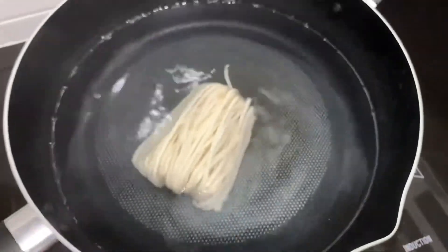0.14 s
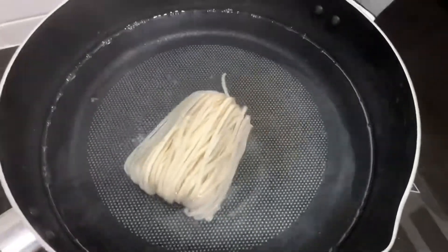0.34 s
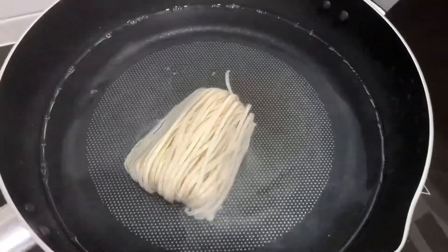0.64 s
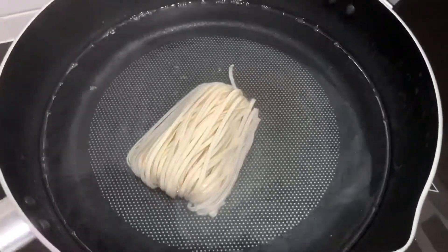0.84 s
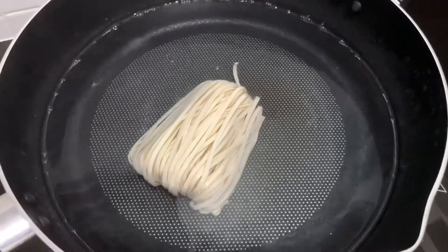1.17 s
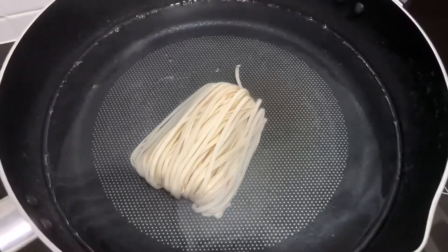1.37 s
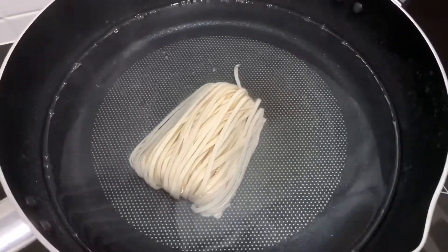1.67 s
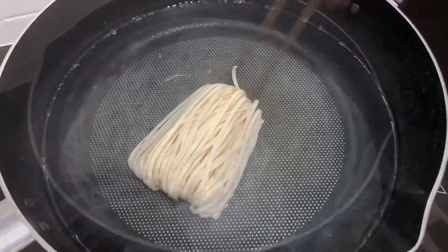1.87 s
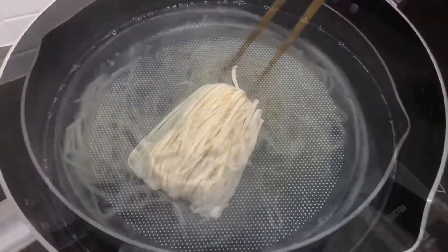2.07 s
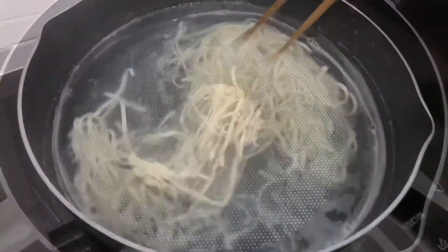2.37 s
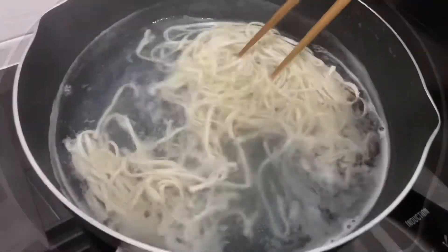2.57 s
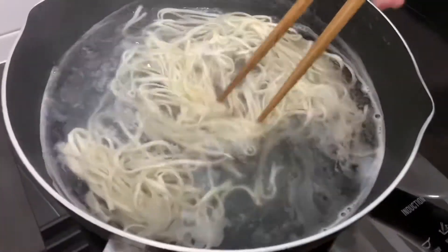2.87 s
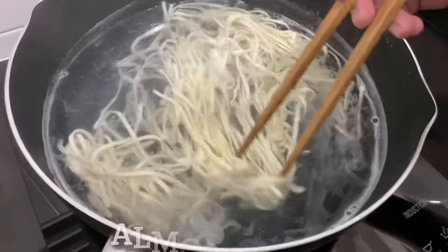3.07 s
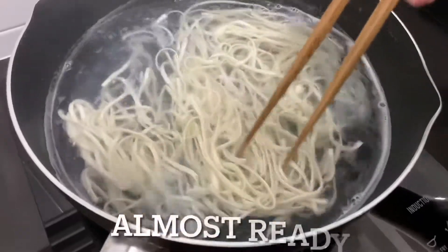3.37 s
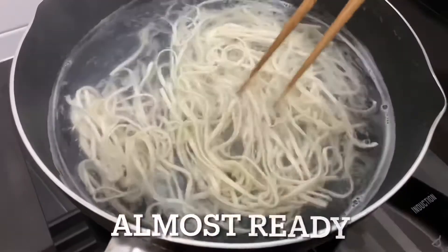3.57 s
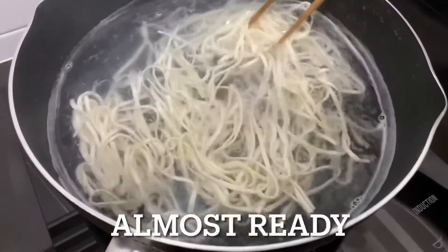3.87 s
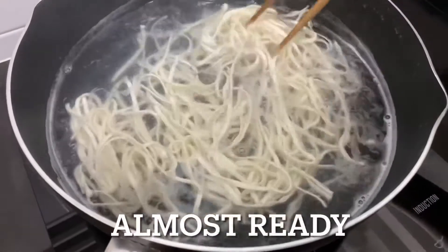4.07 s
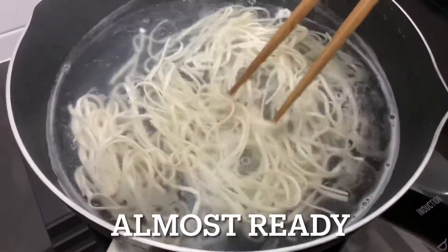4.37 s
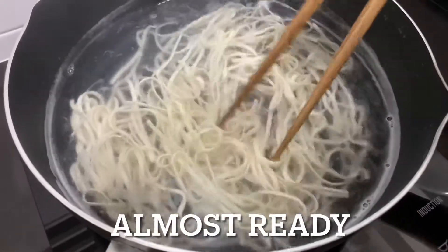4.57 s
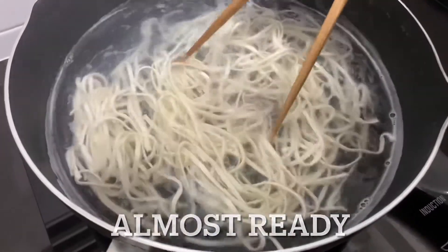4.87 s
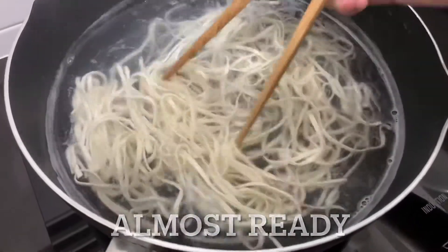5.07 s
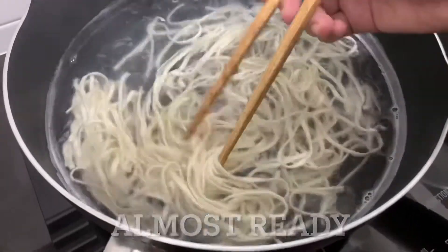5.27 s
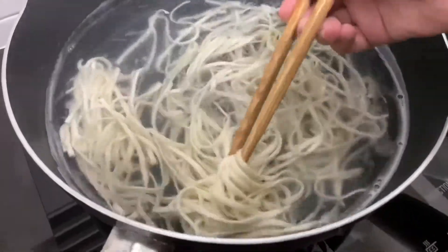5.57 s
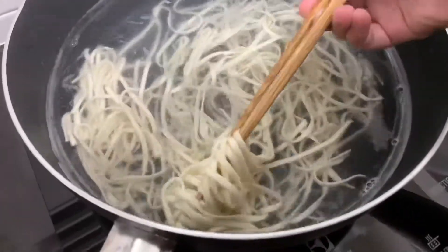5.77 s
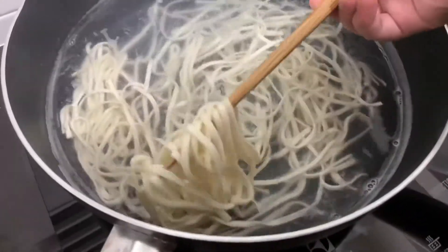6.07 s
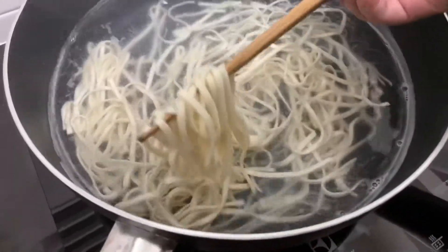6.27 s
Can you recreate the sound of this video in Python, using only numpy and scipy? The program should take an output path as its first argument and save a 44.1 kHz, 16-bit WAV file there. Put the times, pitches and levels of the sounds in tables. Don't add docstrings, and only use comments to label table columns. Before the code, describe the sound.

A cooling fan hums low and wavering under a pan of softly simmering water, then a louder boil buzzes and bubbles with short steam hisses.

```python
import sys
import numpy as np
from scipy import signal
from scipy.fft import irfft
from scipy.io import wavfile
from scipy.ndimage import uniform_filter1d

SR = 44100
rng = np.random.default_rng(int(sys.argv[2]) if len(sys.argv) > 2 else 0)


def to_linear_factor(level_db):
    exponent = np.asarray(level_db, float) / 20
    return 10 ** exponent


def dump(signal):
    limited = np.clip(np.atleast_2d(signal).T, -1, 1)
    pcm = np.round(limited * 32767).astype(np.int16)
    wavfile.write(sys.argv[1], SR, pcm)


N = 283563
T = np.arange(N) / SR
HZ, FRAME_S = signal.stft(T, SR, nperseg=1024, noverlap=768)[:2]


def evened(x):
    return x / np.sqrt(np.mean(abs(x) ** 2) + 1e-20)


def read(points, hz):
    f, value = np.transpose(points)
    return np.interp(np.log(hz + 1), np.log(f + 1), value)


def spectra(x):
    return signal.stft(x, nperseg=1024, noverlap=768)[2]


def waves(z):
    return signal.istft(z, nperseg=1024, noverlap=768)[1][..., :N]


def waver(width_hz):
    r = np.exp(-np.pi * width_hz / SR)
    z = rng.standard_normal(N + SR) + 1j * rng.standard_normal(N + SR)
    once = signal.lfilter([1], [1, -r], z)
    return evened(signal.lfilter([1], [1, -r], once)[SR:])


def patchy(shape, bins, frames):
    field = uniform_filter1d(rng.standard_normal(shape), size=bins, axis=0)
    return evened(uniform_filter1d(field, size=frames, axis=1))


def bump(hz, width_hz):
    return 1 / (1 + (2 * (HZ - hz) / width_hz) ** 2)


def band(x, lo_hz, hi_hz):
    return signal.sosfiltfilt(signal.butter(2, [lo_hz, hi_hz], "band", fs=SR, output="sos"), x)


# time in seconds, share of the boil from 0 to 1.
DISSOLVE = [(0, 0), (1.75, 0.05), (2.0, 0.27), (2.3, 0.49), (2.65, 0.97), (6.43, 1)]


def boil_share(t):
    return np.clip(np.interp(t, *np.transpose(DISSOLVE)), 0, 1)


# frequency in Hz, shared part from 0 to 1.
PORT_LIKENESS = [(60, .9), (170, .98), (300, .75), (600, .5), (1100, .5), (1700, .25), (3100, .3),
                 (3800, .7), (4600, .99), (16000, .99)]


def ports(z, turn):
    same = np.clip(read(PORT_LIKENESS, HZ), 0, 1)[:, None]
    lag = -2 * np.pi * (HZ - 6820) / 4125
    phase = np.where(HZ < 3500, read(turn, HZ) * (HZ > 200), lag)
    right = same * np.exp(1j * phase)[:, None] * z[0] + np.sqrt(1 - same ** 2) * z[1]
    return np.array([z[0], right])


# time in seconds, level in dB.
BLADE_LEVEL = [(0, -34), (.7, -36), (.9, -36.5), (1.0, -34), (1.1, -35.5), (1.8, -37.5), (2.08, -35.5),
               (2.2, -39), (2.4, -36.5), (2.65, -31.5), (3.03, -33), (3.3, -31), (3.62, -32.5), (4.42, -33),
               (4.54, -35.5), (4.68, -33), (5.4, -32.5), (6.43, -34.5)]
# frequency in Hz, simmer level in dB, boil level in dB, waver from 0 to 1.
STEADY_HUMS = [(100.43, -49, -57, .2), (105.1, -58, -59, 0.5), (135.6, -59.5, -59.5, 1),
               (144, -62, -57, 0.8)]
# frequency in Hz, width in Hz, level in dB.
HOUSING_HUMS = [(46.1, 7.9, -55.5), (65.1, 10, -61), (81, 14, -64), (151.2, 18, -55), (185.3, 40, -59)]


def fan():
    share = boil_share(T)
    blade_hz = np.where(share < 0.33, 129.4, 127.95)
    turn = np.exp(2j * np.pi * np.cumsum(blade_hz) / SR)
    tone = to_linear_factor(np.interp(T, *np.transpose(BLADE_LEVEL))) * turn * (1 + 0.094 * waver(38) + 0.069 * waver(5))
    for hz, simmer_db, boil_db, loose in STEADY_HUMS:
        level = to_linear_factor(simmer_db + (boil_db - simmer_db) * share)
        tone = tone + level * np.exp(2j * np.pi * hz * T) * (1 + loose * waver(1.5))
    for hz, width_hz, db in HOUSING_HUMS:
        tone = tone + to_linear_factor(db) * waver(width_hz) * np.exp(2j * np.pi * hz * T)
    lean = to_linear_factor([[-0.3], [0.3]]) * np.exp([[0.04j], [-0.04j]])
    return np.sqrt(2) * (tone * lean).real


# multiple of the mains, level in dB, waver width in Hz, clean share from 0 to 1,
# lead of the left port in radians.
COIL_LINES = [(9, -44, 26, 0.97, 0.98), (12, -56, 32, 0.08, 0), (16, -62, 14, 0.5, -0.0071),
              (20, -51, 45, .4, -0.55), (24, -59.5, 10, 0.17, -1.5), (27, -53, 13, 0.4, 1.66),
              (44, -69.5, 6, 0.1, 0.75), (45, -66, 6.6, 0.8, 0.41)]


def coil():
    mains_hz = 49.97
    out = np.zeros((2, N))
    for multiple, db, width_hz, clean, lead in COIL_LINES:
        turn = np.exp(2j * np.pi * multiple * mains_hz * T)
        line = to_linear_factor(db) * (np.sqrt(clean) + np.sqrt(1 - clean) * waver(width_hz)) * turn
        out += np.sqrt(2) * (line * np.exp(0.5j * np.array([[lead], [-lead]]))).real
    return out * boil_share(T)


# time in seconds, level in dB.
WATER_SWELL = [(0, -1), (.6, -1), (1.5, 0), (2.4, 0.5), (3, 0.5), (4.8, 0.3), (6.43, 0)]


def air(tone_db, turn, patchy_db, blob_db, flicker_db):
    z = spectra(rng.standard_normal((2, N))) * np.sqrt(SR / 2)
    wide = patchy(z.shape[1:], bins=10, frames=14)
    narrow = patchy(z.shape[1:], bins=2, frames=5)
    flicker = evened(uniform_filter1d(rng.standard_normal(len(FRAME_S)), size=6))
    swell = np.interp(FRAME_S, *np.transpose(WATER_SWELL)) * (HZ > 200)[:, None]
    level_db = tone_db[:, None] + patchy_db * wide + blob_db * narrow + flicker_db * flicker + swell
    return ports(z * to_linear_factor(level_db), turn)


# frequency in Hz, level in dB per Hz.
SIMMER_NOISE = [(28, -99), (45, -75), (90, -72.5), (200, -80.5), (250, -80), (400, -80.5), (950, -79.5),
                (1200, -87), (1600, -85.5), (2000, -89.5), (4000, -102), (5500, -109), (7000, -116),
                (15500, -120)]
BOIL_NOISE = [(28, -99), (45, -74), (90, -74), (200, -75.5), (250, -80.5), (550, -73.5), (1150, -79.5),
              (2100, -84.5), (4000, -93), (6000, -101), (7200, -113), (10000, -117), (15500, -119)]
# frequency in Hz, width in Hz, lift in dB.
PAN_RINGS = [(313, 36, 8), (432, 48, 8.5), (507, 51, 7), (594, 50, 3.5), (835, 120, 4), (1015, 85, 10.5),
             (1436, 71, 7), (1625, 160, 6), (1926, 61, 6), (2607, 390, 6), (3450, 120, 4.5)]
# frequency in Hz, phase in radians.
SIMMER_PHASE = [(200, -3), (500, 1.5), (800, 2.6), (1600, 1.5), (2200, 4), (3000, 4), (3500, 4.5)]
BOIL_PHASE = [(200, 1), (450, 0.6), (700, 1.55), (1200, 2), (1500, 0.05), (2200, -2), (3500, -1.7)]


def water():
    share = boil_share(FRAME_S)
    pan_db = sum(db * bump(hz, width_hz) for hz, width_hz, db in PAN_RINGS)
    simmer = air(read(SIMMER_NOISE, HZ), SIMMER_PHASE, patchy_db=1.38, blob_db=3.0, flicker_db=0.5)
    boil = air(read(BOIL_NOISE, HZ) + pan_db, BOIL_PHASE, patchy_db=1.0, blob_db=3.0, flicker_db=0.5)
    return waves(np.sqrt(1 - share ** 2) * simmer + share * boil)


# start in seconds, length in seconds, bright level in dB, dull level in dB,
# whistle in Hz (0 or below for none).
STEAM_JETS = [(.5, .07, -82, -72, 0), (0.734, 0.039, -67, -63.5, 0), (.93, 0.046, -80, -85, 12000),
              (1.09, 0.046, -57, -58, 0), (1.13, .04, -73, -68, 12997), (1.46, 0.067, -78, -58, 0),
              (1.768, 0.12, -85, -65, -2), (1.997, .04, -78, -59, 0), (2.085, 0.082, -82, -63, 9000),
              (2.173, 0.054, -82, -62, 6300), (2.41, 0.36, -62, -60, 6740), (2.61, 0.2, -73, -82, 10200),
              (4.076, 0.27, -66, -56.5, 0), (4.19, 0.1, -76, -69, 10000), (4.86, 0.31, -67.5, -60, 8595),
              (4.95, 0.53, -57.5, -56, 8900), (5.246, 0.13, -71, -68, 14500)]
# frequency in Hz, level in dB.
STEAM_COLOUR = [(2500, -41), (4500, 3.5), (6000, 0), (7800, -3), (12000, -1.5), (15500, -2.5)]
# start in seconds, peak level in dB.
BUBBLE_SNAPS = [
    (2.1975, -56),
    (2.8594, -51),
    (3.5, -61),
]


def steam():
    fine = evened(uniform_filter1d(rng.standard_normal(N), size=60))
    coarse = evened(uniform_filter1d(rng.standard_normal(N), size=500))
    noise = rng.standard_normal((2, N)) * evened(to_linear_factor(1.1 * fine + 0.77 * coarse))
    jets = np.zeros((2, N))
    high = 1 / (1 + (7800 / (HZ + 1)) ** 8)
    for s, length, bright_db, dull_db, whistle_hz in STEAM_JETS:
        at = slice(round(s * SR), round((s + length) * SR))
        hiss = np.sqrt(high * to_linear_factor(2 * bright_db) + (1 - high) * to_linear_factor(2 * dull_db))
        colour = hiss * to_linear_factor(10.5 * bump(whistle_hz, 1400))
        jet = noise[:, at] * signal.windows.tukey(at.stop - at.start, np.clip(2.0 * length + 0.084, 0, 1))
        jets[:, at] += signal.fftconvolve(jet, np.fft.fftshift(irfft(colour))[None], "same", axes=1)
    for s, db in BUBBLE_SNAPS:
        jets[:, round(s * SR):][:, :40] += to_linear_factor(db + 3.0) * noise[:, :40] * np.exp(-np.arange(40) / 12)
    z = spectra(jets)
    wide = patchy(z.shape[1:], bins=12, frames=10)
    narrow = patchy(z.shape[1:], bins=2, frames=4)
    level_db = read(STEAM_COLOUR, HZ)[:, None] + 3.5 * wide + 2.1 * narrow
    return waves(ports(z * to_linear_factor(level_db), BOIL_PHASE))


def scene():
    return water() + fan() + coil() + steam()


# start in seconds, peak level in dB.
SLIP_TICKS = [
    (.102, -38),
    (.166, -44),
    (2.724, -31),
    (2.81, -44),
    (2.963, -37),
    (3.01, -38),
]


def ticks():
    out, t = np.zeros(N), np.arange(800) / SR
    chirp = np.sin(2 * np.pi * np.cumsum(300 + 2000 * np.exp(-t / 0.002)) / SR)
    tick = chirp * np.exp(-t / 0.003) * np.minimum(t / 0.0003, 1)
    for s, db in SLIP_TICKS:
        out[round(s * SR):][:len(t)] += to_linear_factor(db) * tick
    return out


# start in seconds, stop in seconds, low edge in Hz,
# high edge in Hz, turn in radians.
PORT_SLIPS = [(2.5, 3.025, 530, 800, 1.26), (2.45, 3.025, 950, 1060, 1.06), (2.9, 3.08, 60, 200, 0.24),
              (2.6, 3.025, 154, 340, 1), (2.91, 3.025, 250, 1700, 0.73), (0.098, 0.118, 230, 2300, 1.36),
              (0.093, .13, 60, 220, 0.39), (2.72, 2.746, 230, 1100, 1.54), (2.724, 2.748, 60, 213, 0.69),
              (2.805, 2.82, 60, 600, 0.21), (2.99, 3.025, 200, 1300, 1.16), (.165, .185, 60, 900, .3)]


def slip(mid, side):
    for start, stop, lo_hz, hi_hz, turn in PORT_SLIPS:
        at = slice(max(round((start - 0.1) * SR), 0), round((stop + 0.1) * SR))
        angle = turn * uniform_filter1d(1.0 * ((T[at] > start) & (T[at] < stop)), size=120)
        part = band(mid[at], lo_hz, hi_hz)
        side[at] += np.sin(angle) * signal.hilbert(part).imag
        mid[at] += (np.cos(angle) - 1) * part
    return mid, side


# low edge in Hz, high edge in Hz.
SUM_GAPS = [(4500, 5010), (8350, 9550), (12450, 13700)]
DIFFERENCE_GAPS = [(6350, 7500), (10500, 11650), (14500, 30000)]


def drop_gaps(mid, side):
    edge_hz = 70 * patchy((len(HZ), len(FRAME_S)), bins=30, frames=5)
    both = spectra(np.array([mid, side]))
    hiss = both[1, (HZ > 8400) & (HZ < 9500)]
    hiss_db = 10 * np.log10(np.mean(abs(hiss) ** 2, axis=0) + 1e-20)
    excess_db = np.maximum(hiss_db - np.median(hiss_db) - 0.5, 0)
    edge_hz = edge_hz + 30 * np.outer((HZ > 7900) & (HZ < 10000), excess_db)
    hz = HZ[:, None]
    kept = [1 - sum((hz > lo + edge_hz) & (hz < hi - edge_hz) for lo, hi in gaps)
            for gaps in (SUM_GAPS, DIFFERENCE_GAPS)]
    return waves(both * kept * (hz < 15750))


def low_pass(x):
    return signal.sosfilt(signal.butter(12, 17000, fs=SR, output="sos"), x)


def record(dry):
    mid, side = (dry[0] + dry[1]) / 2, (dry[0] - dry[1]) / 2 + ticks()
    mid, side = slip(mid, side)
    mid, side = drop_gaps(mid, side)
    bass_cut = signal.butter(3, 33, "high", fs=SR, output="sos")
    mid, side = signal.sosfilt(bass_cut, [mid, side])
    return low_pass(np.array([mid + side, mid - side]))


dry = scene()
out = record(dry)
dump(out)
```